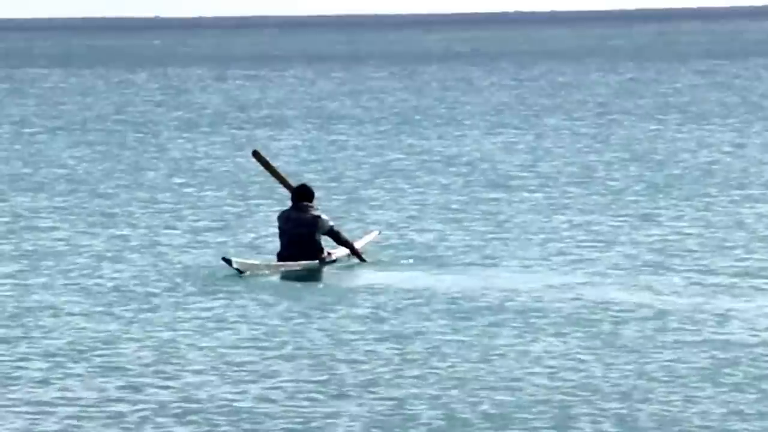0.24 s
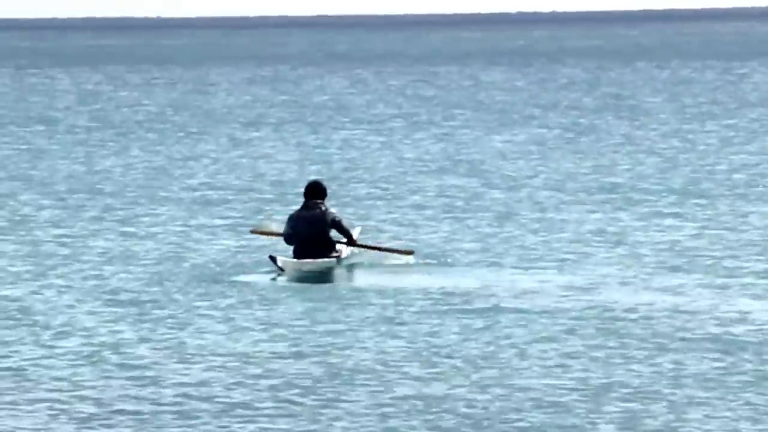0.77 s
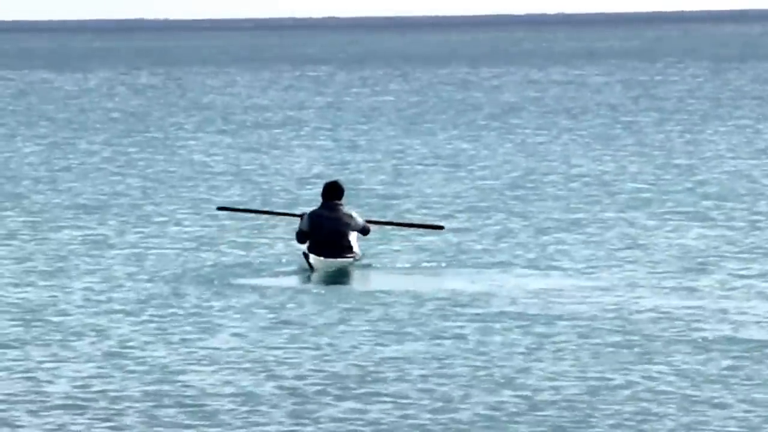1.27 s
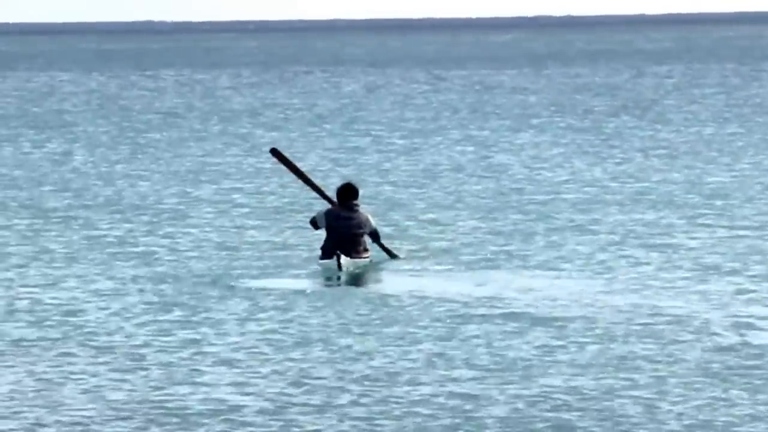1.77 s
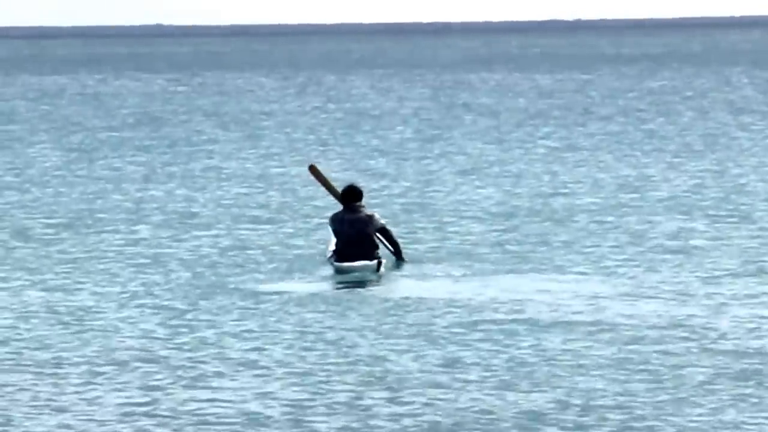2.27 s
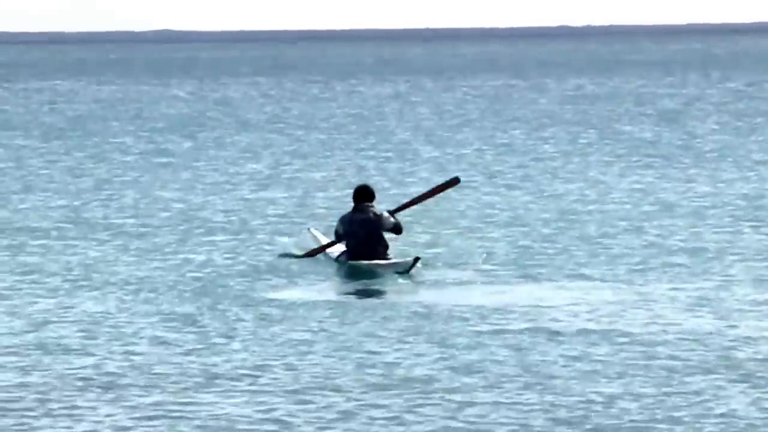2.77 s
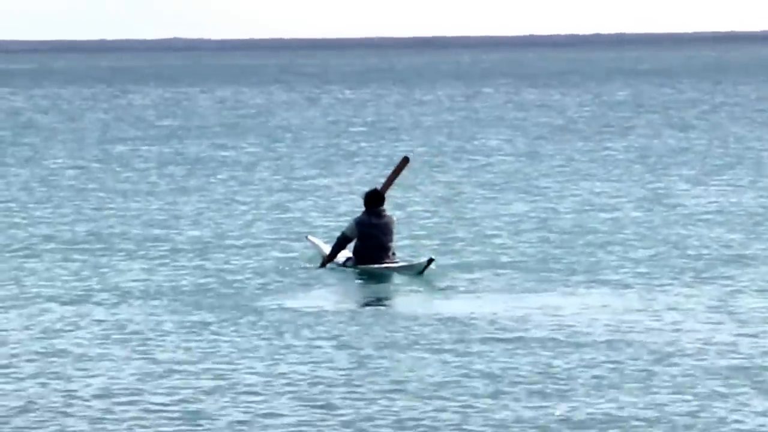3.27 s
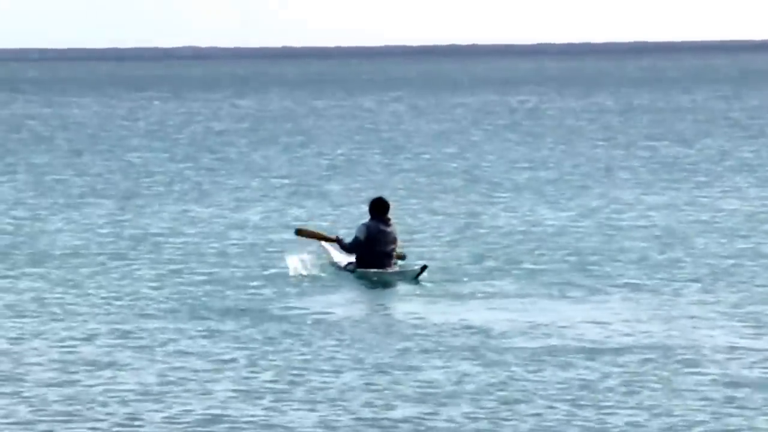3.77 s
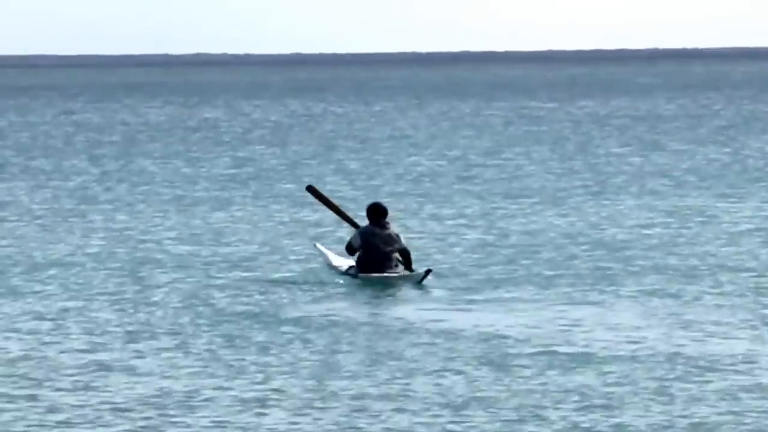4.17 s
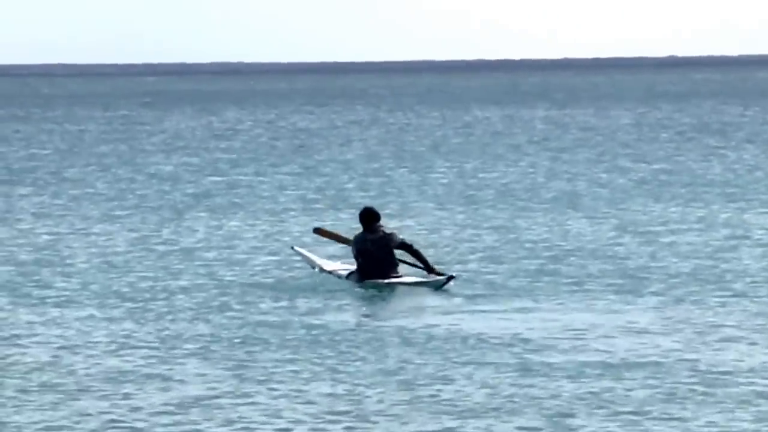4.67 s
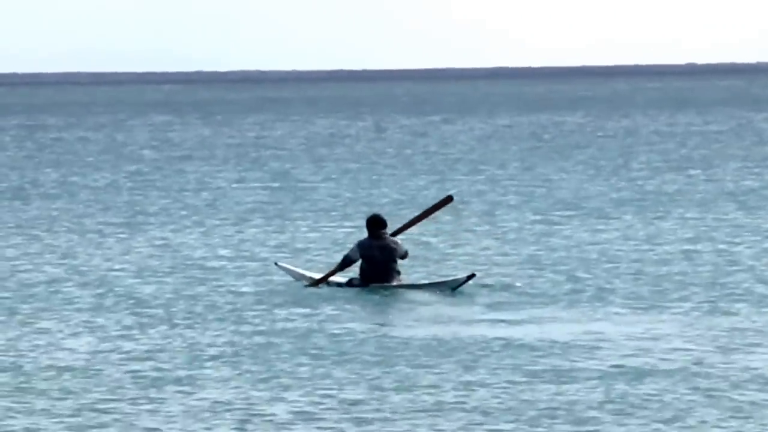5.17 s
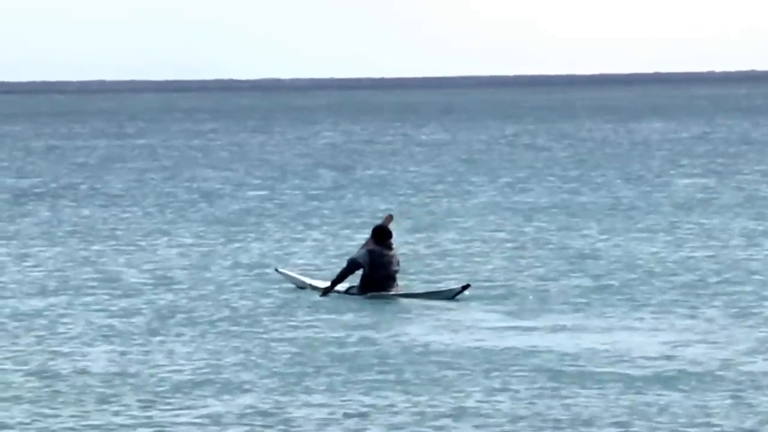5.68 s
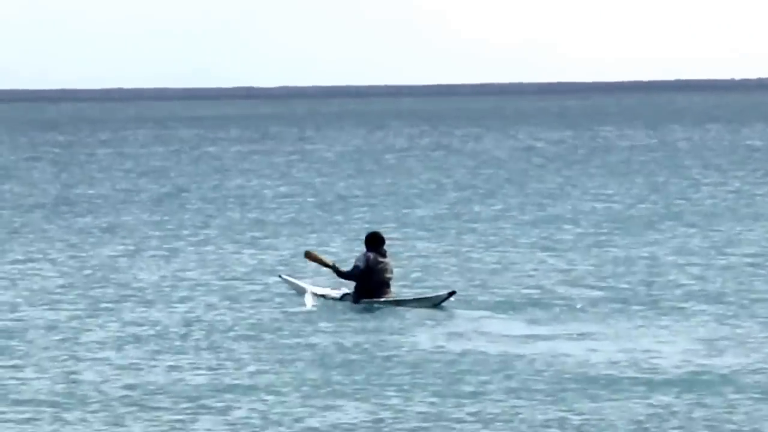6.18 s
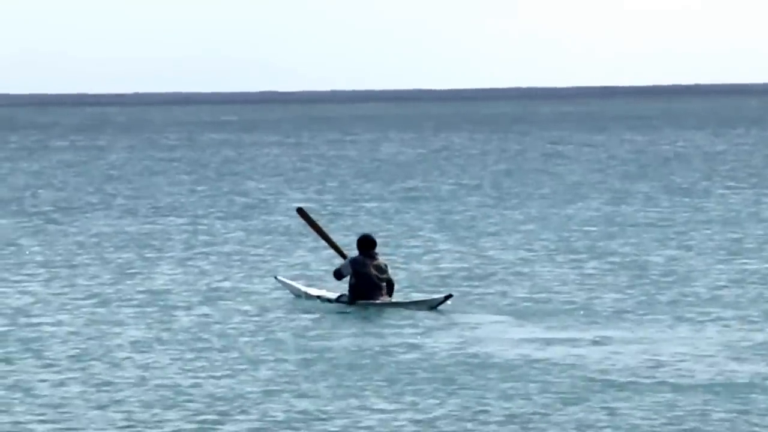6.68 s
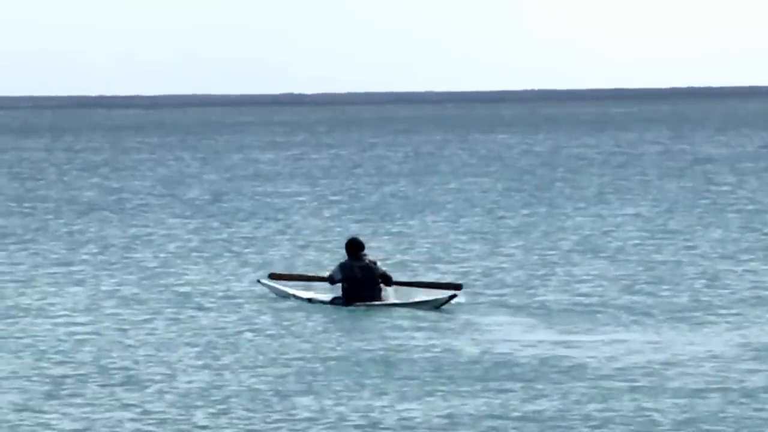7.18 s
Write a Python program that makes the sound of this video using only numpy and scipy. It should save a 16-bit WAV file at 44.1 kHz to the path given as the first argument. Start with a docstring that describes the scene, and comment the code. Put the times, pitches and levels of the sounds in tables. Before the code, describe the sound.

Small waves break and drain at the water's edge, fizzing with foam, with close bubble pops, watery gulps and a soft bump.

```python
"""At the edge of the water, small waves break and drain close to a small microphone.
Each wave is a crowd of ringing bubbles over a rush of foam noise, swelling and then draining away.
Single bubbles pop, drops tick as short noise, and pockets of air gulp as quick strings of bubbles.
A few soft bumps, decaying low tones with a puff of noise, sit over a faint rumble and thin hiss."""
import sys
import numpy as np
from scipy.fft import rfft, irfft, next_fast_len
from scipy.io import wavfile
from scipy.ndimage import map_coordinates

SR = 44100
rng = np.random.default_rng(int(sys.argv[2]) if len(sys.argv) > 2 else 0)


def wav_out(sig):
    """Save sig, one row per channel (or a flat mono array), as 16-bit PCM at SR to the path in sys.argv[1]."""
    wavfile.write(sys.argv[1], SR, np.round(np.clip(np.atleast_2d(sig).T, -1, 1) * 32767).astype(np.int16))


N = 328104  # length of the sound [samples]
TOP_HZ = 15700  # nothing is kept from here up
STEP_S = 0.004  # time step of the level curves

# steady background of wind and hiss: (frequency [Hz], relative level per Hz [dB])
BACKGROUND_SPECTRUM = [(15, 1), (35, 0), (60, -4), (150, -9.5), (350, -11.5), (1000, -14), (5000, -26),
                       (10000, -26.5), (14000, -28.5), (16000, -40)]
# broad response of the microphone: (frequency [Hz], gain [dB])
MICROPHONE_RESPONSE = [(100, -18.5), (350, -16.5), (780, -0.5), (2000, 0), (3400, -1), (5700, -8),
                       (6400, -12.5), (8000, -16), (8700, -21), (10300, -20.5), (11300, -34.5),
                       (15000, -44)]
# peaks and dips from the microphone's port: (centre [Hz], width to each side [Hz], gain [dB])
PORT_RESONANCES = [(556, 131, 7.5), (1013, 190, -8.5), (1317, 170, 9), (4385, 480, 2), (6310, 230, -3.5),
                   (7350, 78, -15)]
# soft bumps on the microphone: (time [s], level [dB], pitch [Hz])
BUMPS = [(1.272, -35, 130), (1.284, -30.5, 170), (1.304, -30.5, 241), (1.312, -30.5, 596),
         (1.314, -32, 137), (1.32, -22.5, 310), (1.38, -38, 216)]
# gulps of trapped air: (time [s], length of the string [s], level [dB], typical pitch [Hz],
# slap relative to the bubbles [dB])
GULPS = [(0.274, 0.054, -38.5, 324, -5), (1.499, .03, -48.5, 750, -12), (3.102, 0.035, -39.5, 535, -3),
         (3.181, .016, -48, 568, 4), (3.8, 0.023, -47.5, 506, -2.5), (4.115, 0.045, -50, 780, -11),
         (5.133, 0.047, -40, 693, -11)]
# drops that tick on the water: (time [s], relative peak [dB])
DROPS = [(0.6544, -33.5), (1.377, -32), (1.5794, -31), (1.916, -20.5), (2.141, -22), (2.174, -31),
         (2.303, -28), (3.962, -32), (4.5531, -27), (5.7644, -32)]
# single bubbles that burst near by: (time [s], relative peak [dB], starting pitch [Hz])
POPS = [(0.307, -9, 4300), (0.965, -17, 4430), (1.124, -20, 2900), (1.213, -25, 1260), (1.491, -26, 1410),
        (1.792, -17, 1410), (1.846, -18, 1270), (1.881, -10.5, 4100), (1.9165, -6, 4600),
        (1.924, -11, 4270), (2.076, -12, 4280), (2.141, -15.5, 4400), (2.329, -20, 1660),
        (3.184, -31, 1380), (3.23, -27, 1320), (3.394, -19, 4270), (3.852, -29, 2300), (3.930, -21, 3630),
        (4.065, -17, 4020), (4.097, -21.5, 2100), (4.265, -15, 1420), (4.282, -12, 1500), (4.918, -9, 5360),
        (5.06, -9, 4100), (5.239, -11, 4230), (5.277, -10, 1290), (5.740, -16.5, 3920), (5.75, -10.5, 3870),
        (6.617, -23, 2500), (7.258, -22.5, 3540)]
# waves that spill on the shore: (crest time [s], rise by 20 dB [s], hold [s], relative level [dB],
# brightness [dB], extra wash [dB], extra gurgle [dB])
WAVES = [(0.0, .1, 0.14, -25.5, 1.3, -0.8, 3), (0.238, 0.12, 0.1, -25.5, 0, 1, 1.3),
         (.93, .13, 0.25, -43, -0.5, 3, -6), (1.54, 0.17, 0.16, -37, 2, -3.5, 0),
         (1.808, .25, 0.21, -34.5, 1.4, -3, 3), (2.33, 0.043, .02, -38.5, 1.5, -3.5, -8),
         (3.004, 1.5, 0.22, -41, -1.4, -0.3, -3), (3.813, .08, .25, -45, -1.5, -3, -6),
         (4.212, .19, 0.078, -35.5, 2, 0.5, 2), (4.53, 0.48, 0.26, -30, 0.44, 0.5, 1),
         (5.165, 1.06, 0.23, -30.5, 1.15, -0.34, 1), (5.668, 0.56, 0.65, -44.5, 1.5, -1.5, 9),
         (7.118, 1.7, 0.38, -46.5, 0.8, -1, 5.5)]
# water folding over as a wave breaks: (time [s], half length [s], lapping level [dB], gurgle level [dB])
SLOSHES = [(0.437, 0.051, -28.5, -30), (1.7, 0.044, -29, -43), (1.84, .04, -32.5, -43),
           (2.074, 0.06, -39, -45), (4.294, 0.11, -30, -41), (5.268, 0.065, -29, -38),
           (5.538, .044, -30, -41.5)]
# how each size of bubble follows a wave, from the biggest to the smallest:
# (relative level [dB], brightness share [-], wash share [-], gurgle share [-], fall [dB/s],
# backwash relative to the crest [dB], drain [dB/s], calm water level [dB])
GURGLE_RESPONSE = (-7, -1, -0.5, 1, 42.5, -15, 13.5, -52)
LAPPING_RESPONSE = (0, -1, -0.5, 0.5, 26, -9.5, 21.5, -46.5)
WASH_RESPONSE = (-2.5, 0.5, 1.5, 0, 44, -2.1, 15, -53.5)
FIZZ_RESPONSE = (0, 0.96, 0, 0, 39, -7.5, 10.5, -48.5)
SPRAY_RESPONSE = (-11.5, 2.5, 0.5, 0, 44, -14, 8.5, -55)


def amp(db):
    """Turn decibels into a gain."""
    return 10 ** (np.asarray(db) / 20)


def unit(x):
    """Scale x to an average strength (rms) of 1."""
    return x / np.sqrt(np.mean(x ** 2) + 1e-20)


def along(points, hz):
    """Read a curve of (frequency, value) points, with frequency on a log axis."""
    f, v = np.transpose(points)
    return np.interp(np.log(hz + 1), np.log(f + 1), v)


def wobble(rate):
    """Make a smooth random curve through this many random points a second."""
    points = rng.standard_normal(int(N * rate / SR) + 4)
    return map_coordinates(points, [np.arange(N) * rate / SR])


def filtered(x, gain):
    """Give x this gain at each frequency, with no sound ahead of its cause."""
    m = 2 * next_fast_len(len(x) // 2 + 4096)
    log_gain = np.log(np.maximum(gain(np.fft.rfftfreq(m, 1 / SR)), 1e-6))
    # folding the cepstrum forward in time gives the minimum-phase filter
    cepstrum = irfft(log_gain, m)
    cepstrum[1:m // 2] *= 2
    cepstrum[m // 2 + 1:] = 0
    return irfft(rfft(x, m) * np.exp(rfft(cepstrum)), m)[:len(x)]


def noise_through(length, gain):
    """Filter fresh random noise of this many samples."""
    return filtered(rng.standard_normal(length), gain)


def band(hz, low_hz, high_hz, order=8):
    """Gain that passes only a band; a higher order has steeper edges."""
    low_side = 1 + (low_hz / (hz + 1)) ** (2 * order)
    high_side = 1 + (hz / high_hz) ** (2 * order)
    return (low_side * high_side) ** -0.5


def microphone(hz):
    """Gain of the microphone: a broad response with the port's peaks and dips on it."""
    port_db = sum(db * np.exp(-((hz - centre) / width) ** 2) for centre, width, db in PORT_RESONANCES)
    return amp(along(MICROPHONE_RESPONSE, hz) + port_db)


def add(track, s, sound):
    """Mix a sound into the track at time s."""
    part = track[max(round(s * SR), 0):][:len(sound)]
    part += sound[:len(part)]


def background(level_db=-47.0):
    """Air makes a light, slightly uneven rumble, with a thin hiss above it: shaped noise."""
    air = noise_through(N, lambda f: amp(along(BACKGROUND_SPECTRUM, f)))
    return amp(level_db + 0.39 * wobble(3.9)) * unit(air)


def bumps(cycles=1.06, puff_db=-5, puff_t60=0.09):
    """Dull pushes on the microphone die within a cycle or two, each with a low puff of air."""
    track, t = np.zeros(N), np.arange(SR // 12) / SR
    for s, db, hz in BUMPS:
        age = 2 * t * hz / cycles
        push = np.sin(2 * np.pi * hz * t) * age * np.exp(1 - age)
        puff = unit(noise_through(len(t), lambda f: band(f, 86, 460, order=4)))
        puff_gain = amp(puff_db - 60 * t / puff_t60)  # falls 60 dB in puff_t60 seconds
        add(track, s, amp(db) * (push + puff_gain * puff))
    return track


def bubble(t, hz, cycles, rise):
    """A bubble rings and fades over some cycles; its pitch rises as it nears the surface."""
    age = t * hz / cycles
    ring = np.sin(2 * np.pi * hz * t * (1 + rise * np.tanh(age / 2) / 2))
    return ring * np.exp(-age) * (1 - np.exp(-2 * t * hz))  # fade, then soft start


def gulps(cycles=3, count=6):
    """A pocket of air collapses into a quick string of big bubbles, with a slap of water."""
    track, t = np.zeros(N), np.arange(SR // 8) / SR
    for s, length, db, hz, slap_db in GULPS:
        starts = (np.arange(count) + rng.random(count) / 2) * length / count
        pitches = hz * np.exp(0.034 * rng.standard_normal(count))
        string = sum(bubble(np.maximum(t - start, 0), pitch, cycles, rise=0.025)
                     for start, pitch in zip(starts, pitches))
        burst = rng.standard_normal(len(t)) * np.exp(-(t / length) ** 4)
        slap = filtered(burst, lambda f: band(f, 300, 1400, order=4))
        gulp = filtered(unit(string) + amp(slap_db) * unit(slap), microphone)
        # the root refers the level to the string's length, not to the whole buffer
        add(track, s, amp(db) * unit(gulp) * np.sqrt(t[-1] / length))
    return track


def drops(t60=0.0088, level_db=4.0):
    """A drop meets the water with a short bright tick: noise that falls 60 dB in t60 seconds."""
    track, t = np.zeros(N), np.arange(SR // 40) / SR
    for s, db in DROPS:
        burst = rng.standard_normal(len(t)) * amp(-60 * t / t60)
        tick = filtered(burst, lambda f: microphone(f) * band(f, 6800, 15000, order=3))
        add(track, s, amp(db + level_db) * tick / np.abs(tick).max())
    return track


def pops(cycles=3, level_db=-2.0, trail_s=0.006, trail_db=-14, scatter=0.12, count=5):
    """One bubble rings out above the surf, trailed by a few fainter ones of about its pitch."""
    track, t = np.zeros(N), np.arange(SR // 25) / SR
    for s, db, hz in POPS:
        delays = trail_s * rng.exponential(size=count)
        pitches = hz * np.exp(scatter * rng.standard_normal(count))
        trail = sum(bubble(np.maximum(t - delay, 0), pitch, cycles, rise=0.22)
                    for delay, pitch in zip(delays, pitches))
        main = bubble(t, hz, cycles, rise=0.1)
        ring = filtered(main + amp(trail_db) * trail, microphone)
        add(track, s, amp(db + level_db) * ring / np.abs(ring).max())
    return track


def cloud(low_hz, high_hz, rate, cycles, spread_db, foam_db):
    """Countless bubbles of one size, rate a second, over the even rush of foam, at rms 1."""
    count = int(rate * N / SR)
    when, pitch, size, sign = rng.random((count, 4)).T[:, :, None]
    hz = low_hz + (high_hz - low_hz) * pitch
    t = np.arange(int(5 * cycles * SR / low_hz)) / SR
    # most bubbles are faint, a few stand out
    loudness = amp(-spread_db * np.log(np.maximum(size, 0.025)))
    strength = loudness * np.sqrt(hz) * np.sign(sign - 0.5)
    rings = strength * bubble(t, hz, cycles, rise=0.16)
    # add up all the rings, each at its own moment
    where = (when * N).astype(int) + np.arange(len(t))
    bubbles = np.bincount(where.ravel(), rings.ravel(), N)[:N]
    foam = noise_through(N, lambda f: band(f, low_hz, high_hz))
    water = unit(bubbles) + amp(foam_db) * unit(foam)
    return unit(filtered(water, lambda f: microphone(f) * band(f, low_hz / 2, high_hz * 1.11, order=4)))


def stir(level_db, bright_share, wash_share, gurgle_share, fall_db_per_s, backwash_db, drain_db_per_s,
         calm_db):
    """Level [dB] of one bubble size: waves swell, hold, collapse and leave a slowly draining backwash."""
    t = np.arange(0, N / SR, STEP_S)
    power = amp(calm_db) ** 2
    for s, rise, hold, db, bright_db, wash_db, gurgle_db in WAVES:
        colour_db = bright_share * bright_db + wash_share * wash_db + gurgle_share * gurgle_db
        swell_db = -20 * np.maximum(s - t, 0) / rise
        crest = amp(db + level_db + colour_db + swell_db)
        age = np.maximum(t - s - hold, 0)
        collapse = amp(-fall_db_per_s * age)
        backwash = amp(backwash_db - drain_db_per_s * age)
        power = power + crest ** 2 * (collapse ** 2 + backwash ** 2)
    return np.interp(np.arange(N) / SR, t, 10 * np.log10(power))


def sloshing():
    """Gains of the brief surges of lapping and gurgle where water folds over."""
    t = np.arange(0, N / SR, STEP_S)
    gains = sum(np.outer(amp([lap_db, gurgle_db]), np.exp(-((t - s) / half) ** 2))
                for s, half, lap_db, gurgle_db in SLOSHES)
    return [np.interp(np.arange(N) / SR, t, gain) for gain in gains]


def surf(thud_db=-23):
    """Waves stir five sizes of bubble; the tumbling water makes them surge slightly together."""
    gurgle_db = stir(*GURGLE_RESPONSE)
    slosh_lapping, slosh_gurgle = sloshing()
    tumble_db = 0.5 * wobble(30) + 0.7 * wobble(75)

    # hypot adds the power of the waves and the sloshes
    gurgle_gain = np.hypot(amp(gurgle_db), slosh_gurgle) * amp(tumble_db + 0.18 * wobble(8.7))
    lapping_gain = np.hypot(amp(stir(*LAPPING_RESPONSE)), slosh_lapping) * amp(tumble_db)
    wash_gain = amp(stir(*WASH_RESPONSE) + tumble_db)
    fizz_gain = amp(stir(*FIZZ_RESPONSE) + tumble_db + 0.26 * wobble(45))
    spray_gain = amp(stir(*SPRAY_RESPONSE) + tumble_db)

    gurgle = gurgle_gain * cloud(307.5, 1043, rate=260, cycles=4.2, spread_db=3.5, foam_db=2.5)
    lapping = lapping_gain * cloud(1067, 1877, rate=350, cycles=4.9, spread_db=3.5, foam_db=3.0)
    wash = wash_gain * cloud(1786, 3270, rate=600, cycles=3.7, spread_db=1.5, foam_db=0.0)
    fizz = fizz_gain * cloud(3670, 5400, rate=870, cycles=2.5, spread_db=4.0, foam_db=1.0)
    spray = spray_gain * cloud(5630, 17400, rate=700, cycles=2.4, spread_db=3.0, foam_db=3)

    # the weight of the falling water adds a low thud under the biggest bubbles
    low_noise = unit(noise_through(N, lambda f: band(f, 70, 380, order=3)))
    thud = amp(gurgle_db + thud_db) * low_noise
    return gurgle + lapping + wash + fizz + spray + thud


def scene():
    """Everything is heard at one microphone, so the layers simply add."""
    return (background() + bumps() + gulps() + drops() + pops() + surf())[None]


def record(dry):
    """The top of the treble is cut off sharply at the band limit."""
    m = next_fast_len(N + SR // 4)
    kept = np.fft.rfftfreq(m, 1 / SR) < TOP_HZ
    return irfft(rfft(dry, m) * kept, m)[:, :N]


dry = scene()
out = record(dry)
wav_out(out)
```